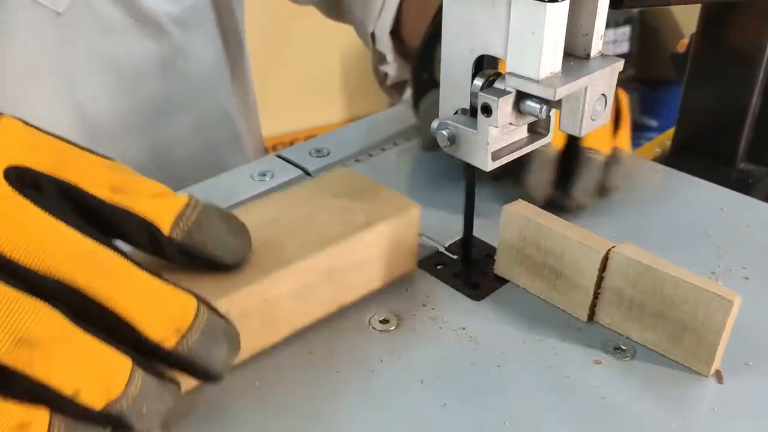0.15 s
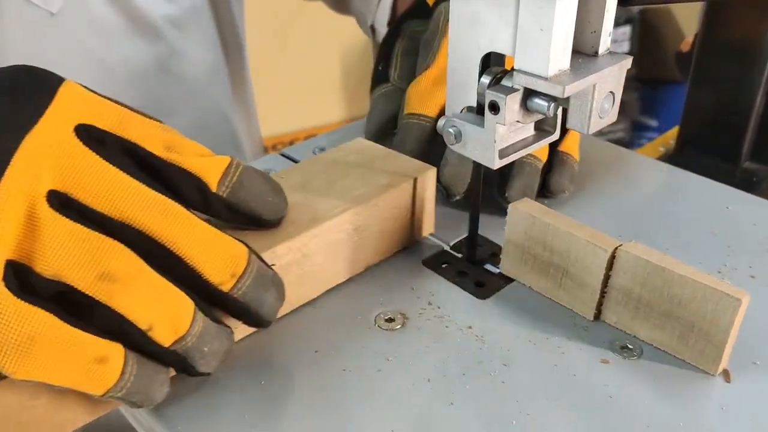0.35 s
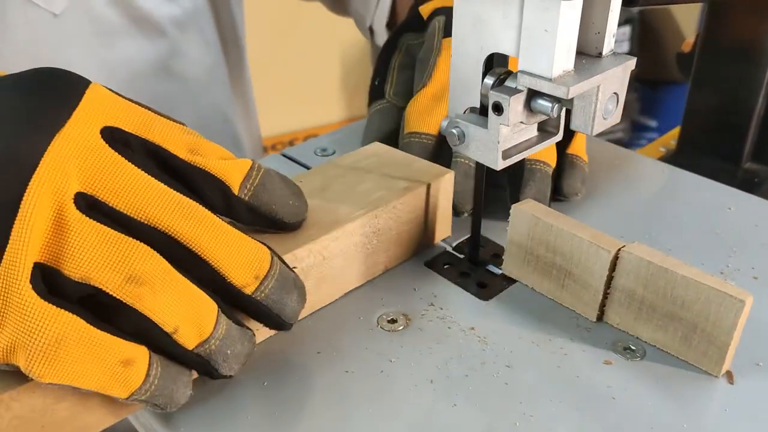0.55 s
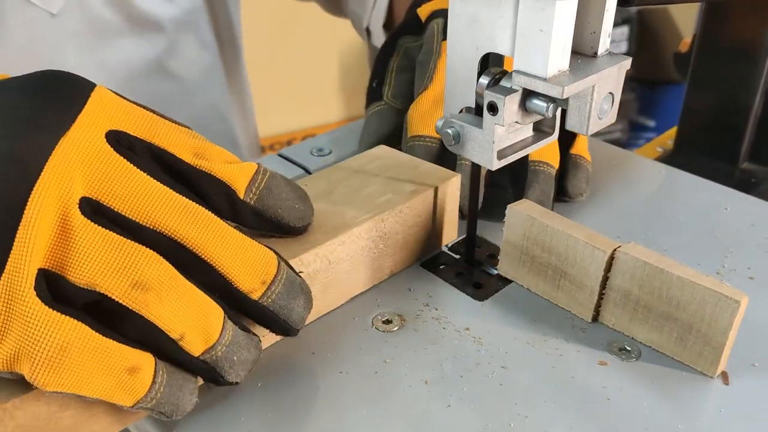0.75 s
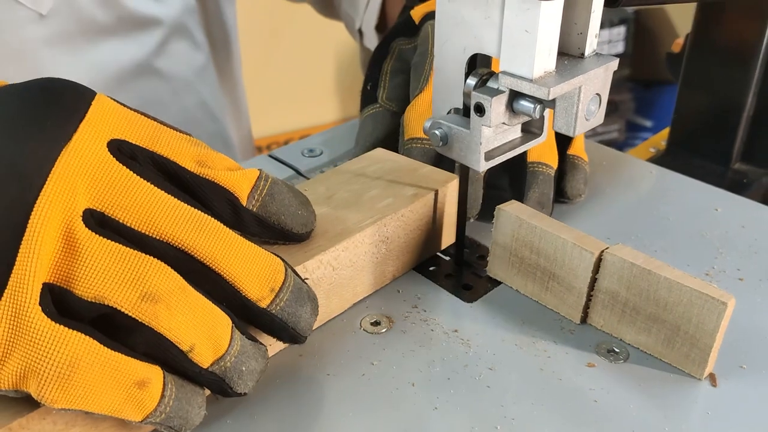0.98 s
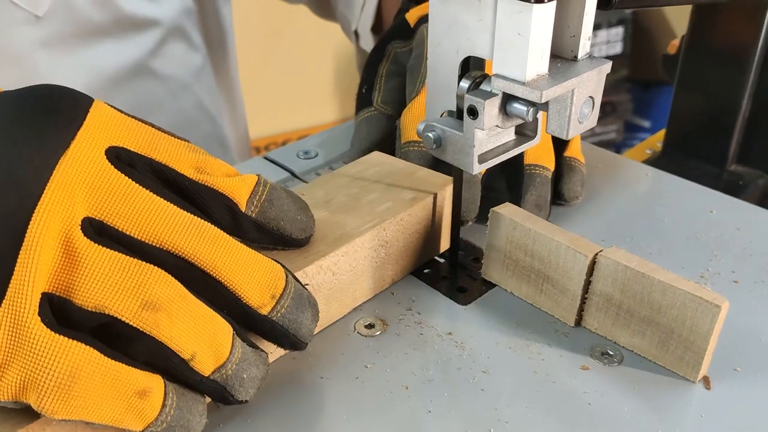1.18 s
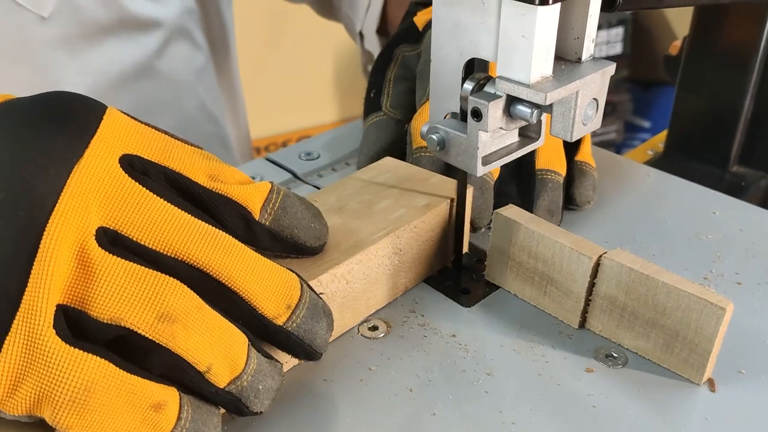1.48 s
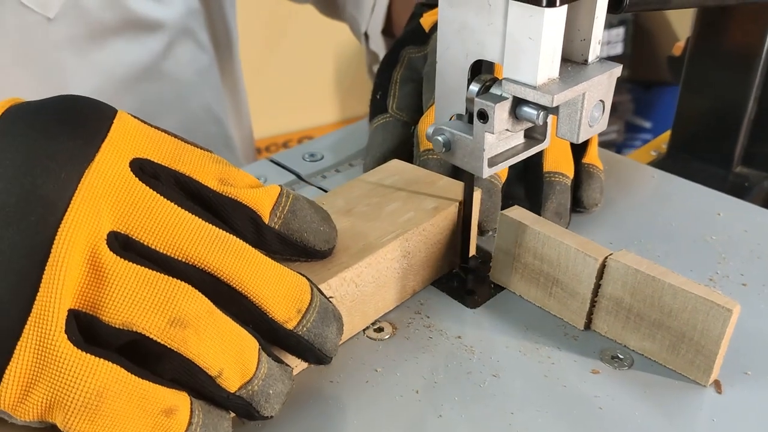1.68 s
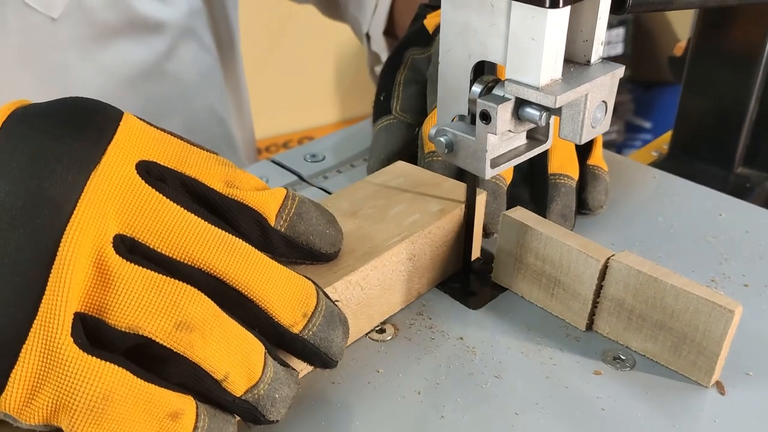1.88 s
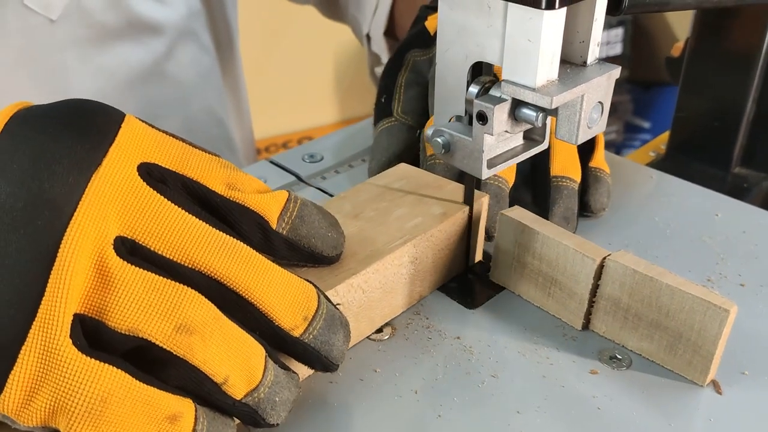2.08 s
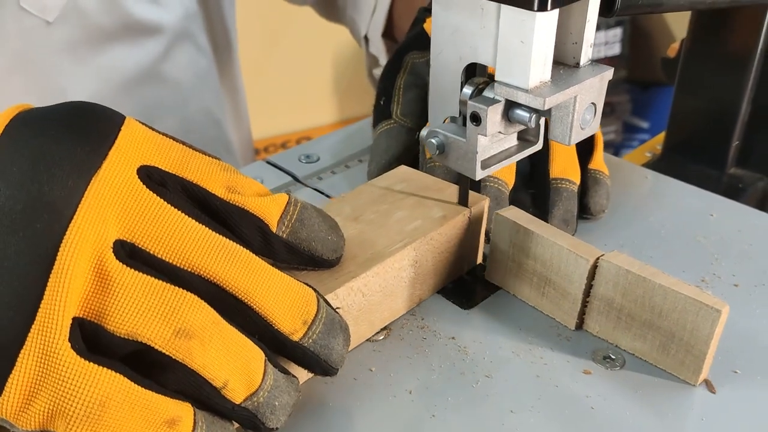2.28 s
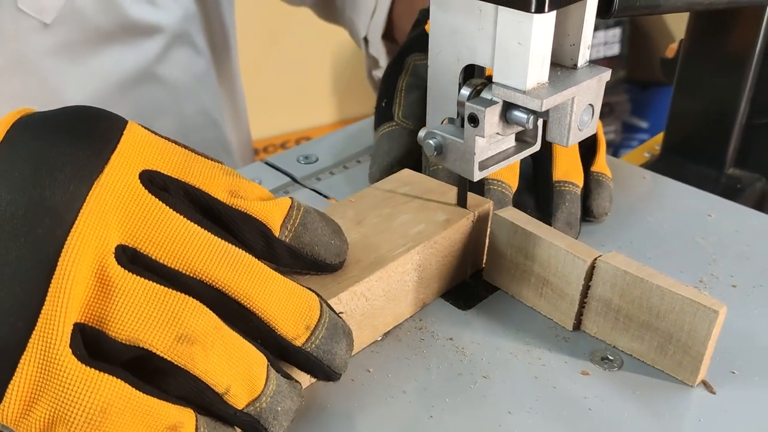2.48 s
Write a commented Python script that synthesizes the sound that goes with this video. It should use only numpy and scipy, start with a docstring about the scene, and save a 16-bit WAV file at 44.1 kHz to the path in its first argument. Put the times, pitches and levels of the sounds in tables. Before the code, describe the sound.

A band saw hums, then rasps and whines as it cuts into a block of wood.

```python
"""A hum, a whine and a thin ring of the blade in its guides: a benchtop band saw idles close to a mono
microphone, which puffs of air buffet. A wooden block brushes over the table and meets the blade at
1.5 s. The teeth rasp and sing at their passing rate, surging three times a lap of the blade, and
shake the block and the table; now and then the blade chatters in the kerf."""
import sys
import numpy as np
from scipy import signal
from scipy.fft import rfft, irfft
from scipy.io import wavfile

SR = 44100
rng = np.random.default_rng(int(sys.argv[2]) if len(sys.argv) > 2 else 0)


def master_out(mix):
    """Clip the mix to full scale and print it as 16-bit PCM to the path in sys.argv[1]."""
    frames = np.transpose(np.atleast_2d(mix))
    ceiling = np.clip(frames, -1, 1)
    pcm = np.round(ceiling * 32767).astype(np.int16)
    wavfile.write(sys.argv[1], SR, pcm)


N = 116865
T = np.arange(N) / SR
TEETH, CONTACT_S, CONTACT_RISE_S = 372, 1.498, 0.011
# pressure feeding the block into the blade: t/s, relative level/dB
FEED_PRESSURE = [(1.5, -10.5), (1.579, -4), (1.66, -5), (1.72, -3), (1.83, -2.5), (1.95, -3), (2.06, 1),
                 (2.139, -2), (2.199, -1.5), (2.35, -0.5), (2.45, -.5), (2.65, -.5)]


def amp(db):
    """Decibels to gain."""
    return 10 ** (np.asarray(db) / 20)


def unit(x):
    """Scales to rms 1."""
    return x / np.sqrt(np.mean(abs(x) ** 2) + 1e-20)


def curve(points):
    """Joins (t/s, value) points with straight lines."""
    return np.interp(T, *np.transpose(points))


def swell(at, length):
    """A smooth rise and fall around a moment."""
    return np.exp(-((T - at) / length) ** 2)


def colour(x, points):
    """Filters by a spectrum (f/Hz, relative level/dB); rms 1."""
    hz, db = np.transpose(points)
    f = np.fft.rfftfreq(N, 1 / SR)
    gain = amp(np.interp(np.log(f + 1), np.log(hz + 1), db))
    return unit(irfft(rfft(x) * gain, N))


def ring(x, hz, width):
    """A steep-sided resonance; rms 1."""
    f = np.fft.rfftfreq(N, 1 / SR)
    return unit(irfft(rfft(x) / (1 + 1j * (f - hz) / width) ** 2, N))


def tone(hz, unsteady, width_hz):
    """A tone whose strength and phase wander, from pure (unsteady 0) to narrow noise (1); rms 1."""
    f = np.fft.fftfreq(N, 1 / SR)
    a, b = rng.standard_normal((2, N))
    wander = unit(np.fft.ifft((a + 1j * b) / (1 + (f / width_hz) ** 2) ** 1.47))
    carrier = np.exp(2j * np.pi * np.cumsum(hz * np.ones(N)) / SR)
    return unit(((np.sqrt(1 - unsteady ** 2) + unsteady * wander) * carrier).real)


def idle():
    """Motor hum, wheel whine that sags under load and the blade rubbing its guides, over a whirr."""
    # hum and high tones of the machine: f/Hz, level/dB, unsteadiness/0-1, width/Hz
    motor_tones = [(49.4, -31, 0, 10), (300.4, -49, 0.54, 2.7), (365, -51, 0, 13), (4220, -63.5, 0.9, 100),
                   (5470, -66, 1, 90), (9630, -77, 1, 200), (10070, -82, 0.95, 90), (11660, -82, 0.93, 120)]
    # ring of the blade in its guides: t/s, level/dB
    guide_levels = [(0, -56), (.11, -52.5), (.19, -79), (.28, -66), (.34, -54), (.68, -57), (.75, -47.5),
                    (.88, -65), (.97, -49.5), (1.05, -50.5), (1.2, -58.5), (1.36, -49.5), (1.48, -56),
                    (2.65, -44)]
    # whirr of air and bearings: f/Hz, relative level/dB
    whirr_spectrum = [(110, -15), (175, -16), (240, -6), (330, -1), (400, -7), (450, -7), (540, -9.5),
                      (620, -3.5), (720, -1.5), (790, -3.5), (880, -11), (1000, -12), (1220, -11),
                      (1450, -15), (1680, -9.5), (1850, -14), (2000, -19.5), (2550, -17.5), (2800, -23),
                      (3080, -22), (3500, -18.5), (3900, -21.5), (4250, -29), (4400, -42), (4750, -24.5),
                      (5150, -26), (6200, -29.5), (7300, -35), (8800, -38.5), (9700, -39.5), (10500, -45),
                      (13500, -51), (15700, -51)]
    hum = sum(amp(db) * tone(hz, unsteady, width) for hz, db, unsteady, width in motor_tones)
    times, feed_db = np.transpose(FEED_PRESSURE)
    load = np.interp(T, times, amp(feed_db), left=0)
    whine = amp(-38.5) * tone(hz=738.5 - 6.09 * load, unsteady=.33, width_hz=35)
    guides = amp(curve(guide_levels)) * tone(hz=4993, unsteady=.6, width_hz=45)
    whirr = amp(-39) * colour(rng.standard_normal(N), whirr_spectrum)
    return hum + whine + guides + whirr


def air():
    """A lumpy draught and sharper puffs of eddying air press on the close microphone."""
    # draught at the microphone: t/s, level/dB
    draught_levels = [(0, -20), (.2, -17), (.34, -26.5), (.42, -17.5), (.6, -15.5), (.78, -3.5),
                      (.95, -19.5), (1.15, -20), (1.3, -28), (1.55, -30), (1.7, -34), (1.88, -32.5),
                      (2.03, -9.5), (2.13, -20.5), (2.2, -10.5), (2.45, -18.5), (2.55, -18.5), (2.65, -33)]
    # its rumble: f/Hz, relative level/dB
    draught_spectrum = [(3, -13.5), (10, 16), (25, -4), (50, -11.5), (90, -22.5), (160, -36), (400, -99)]
    # puffs of air: t/s, length/s, level/dB
    puffs = [(.05, 0.035, -31.5), (0.416, 0.026, -25.5), (0.493, 0.017, -16.5), (0.662, 0.018, -12.5),
             (0.708, 0.0072, -13.5), (0.747, 0.012, -11), (0.851, 0.019, -16.5), (0.878, 0.019, -8.5),
             (.92, .008, -16), (0.965, 0.017, -26), (1.042, 0.014, -28), (1.212, 0.017, -29.5),
             (1.926, 0.011, -26), (2.073, 0.011, -14.5), (2.21, 0.017, -27.5), (2.418, 0.0071, -20),
             (2.48, 0.039, -24.5), (2.63, 0.063, -24.5)]
    # their thud: f/Hz, relative level/dB
    puff_spectrum = [(15, -20), (45, 4), (80, -3.5), (150, -13), (230, -21), (350, -44.5), (700, -87)]
    draught = amp(curve(draught_levels)) * colour(rng.standard_normal(N), draught_spectrum)
    buffeting = sum(amp(db) * swell(at, length) for at, length, db in puffs)
    return draught + buffeting * colour(rng.standard_normal(N), puff_spectrum)


def slide():
    """The block brushes over the metal table on its way to the blade."""
    # push of the block: t/s, length/s, level/dB
    pushes = [(0.084, 0.096, -44)]
    # wood rubbing on metal: f/Hz, relative level/dB
    friction_spectrum = [(300, 3), (900, 5), (2600, -6), (3500, 0), (4600, -12), (7000, -15), (10000, -27),
                         (15000, -34)]
    motion = sum(amp(db) * swell(at, length) for at, length, db in pushes)
    return motion * colour(rng.standard_normal(N), friction_spectrum)


def chatter():
    """Single modes of the blade flare up in the kerf."""
    # flares: t/s, length/s, f/Hz, width/Hz, level/dB
    flares = [(1.508, .008, 10750, 250, -47), (1.68, .17, 10800, 260, -53), (1.59, .028, 757, 30, -29),
              (1.93, .07, 596, 20, -41), (2.21, .05, 593, 20, -34), (2.55, .09, 1623, 35, -37),
              (2.55, .09, 1735, 35, -38), (2.362, .008, 5050, 150, -30), (2.57, .14, 5080, 170, -36)]
    return sum(amp(db) * swell(at, length) * tone(hz, unsteady=1, width_hz=width)
               for at, length, hz, width, db in flares)


def strikes(teeth_passed):
    """A click and a spurt of tearing per tooth: each tooth keeps its own bite, each chip its size."""
    tooth = teeth_passed.astype(int)
    bite_db = 2 * rng.standard_normal(TEETH)[tooth % TEETH]
    chip_db = 1.8 * rng.standard_normal(N)[tooth]
    size = amp(bite_db + chip_db)
    clicks = np.diff(tooth, prepend=0) * (size - size.mean())
    spurts = .5 + np.exp(-(teeth_passed % 1) / 1.04)
    return clicks, size * spurts * rng.standard_normal(N)


def shaking(clicks, tearing, feed_db):
    """The strikes shake the block and ring block, table and blade, louder with a harder feed."""
    # dull thrum of the block: f/Hz, relative level/dB
    thrum_spectrum = [(120, -12), (170, -15.5), (197, -1.5), (240, -3), (300, -5), (350, -1), (410, 1),
                      (470, -7), (510, -2.5), (550, -9.5), (680, -4), (790, -4.5), (860, -9), (920, -15.5),
                      (1300, -20), (2500, -63)]
    # modes of block, table and blade: f/Hz, width/Hz, level/dB at 0 dB feed
    modes = [(294.3, 17, -32.5), (323.9, 11.4, -35), (418.5, 23, -48.5), (595.8, 11, -43), (735, 4.3, -43),
             (780, 63, -42), (838, 16, -49.5), (1130, 25, -57), (1649, 20, -44.5), (1773, 93, -43.5),
             (3180, 130, -45.5), (3524, 83, -44), (3830, 60, -46), (4146, 69, -46), (4967, 37, -41),
             (5595, 80, -43.5), (7280, 100, -51.5), (10700, 150, -55.5), (12500, 230, -60)]
    thrum = amp(-29 + 1.36 * feed_db) * colour(clicks, thrum_spectrum)
    force = unit(clicks) + 0.75 * unit(tearing)
    ringing = sum(amp(db) * ring(force, hz, width) for hz, width, db in modes)
    return thrum + amp(0.69 * feed_db) * ringing


def tooth_song(tooth_hz):
    """The teeth sing at their passing rate, with side tones from the blade's flutter."""
    # tones around the passing rate: offset/Hz, unsteadiness/0-1, width/Hz
    partials = [(0, .65, 45), (-170, .6, 35), (-280, 1, 150), (0, 1, 380)]
    # strength of each tone: relative level/dB
    levels = [-34.5, -38.5, -39.5, -36.5]
    return sum(amp(db) * tone(tooth_hz + offset, unsteady, width)
               for (offset, unsteady, width), db in zip(partials, levels))


def cut():
    """Teeth tear the wood, shake it and sing; the blade surges three times a lap."""
    # passing rate of the teeth: t/s, f/Hz
    tooth_rate = [(1.5, 2768), (1.57, 2755), (1.66, 2726), (1.83, 2722), (1.95, 2738), (2.3, 2742),
                  (2.5, 2732), (2.65, 2742)]
    # the teeth grab harder: t/s, length/s, boost of the song/dB
    grabs = [(1.504, 0.013, 11.5), (1.69, 0.0095, 6), (1.745, 0.0057, 5), (1.818, 0.004, 6.5),
             (1.863, 0.0044, 4), (1.905, 0.0096, 7.5), (1.968, .009, 13), (2.043, 0.014, 6.5),
             (2.081, 0.0087, 4.5), (2.105, 0.0071, 9), (2.137, .004, 2), (2.173, .005, 7),
             (2.19, 0.013, 5.5), (2.242, 0.0077, 9), (2.277, 0.0079, 5.5), (2.313, 0.0048, 9.5),
             (2.38, 0.0018, 16), (2.443, 0.006, 1), (2.47, 0.0034, 9), (2.555, 0.0035, 8.5),
             (2.642, .006, 3)]
    # rasp as the teeth reach more of the block's height: t/s, relative level/dB
    engagement = [(1.5, -8), (1.53, -7), (1.665, -5.5), (1.695, -2), (1.85, -1.5), (2.05, 1.5), (2.14, 0),
                  (2.22, .5), (2.4, -0.2), (2.65, 0)]
    # tearing fibres: f/Hz, relative level/dB
    rasp_spectrum = [(500, -32), (900, -11), (1150, -10.5), (1400, -10.5), (1700, -8.5), (2130, -12),
                     (2300, -5.5), (2600, -4.5), (2900, -6.5), (3500, -9.5), (3750, -14), (4500, -11.5),
                     (5200, -9), (6050, -14.5), (7100, -12.5), (7700, -17.5), (8400, -18.5), (8850, -22.5),
                     (9600, -20.5), (11500, -24.5), (12700, -29.5), (14000, -32), (15600, -37)]
    feed_db, tooth_hz = curve(FEED_PRESSURE), curve(tooth_rate)
    teeth_passed = np.cumsum(tooth_hz) / SR
    laps = (teeth_passed - np.interp(CONTACT_S, T, teeth_passed)) / TEETH
    surge_db = 3.4 * np.cos(2 * np.pi * 3 * (laps - 0.028))
    grab_db = surge_db + sum(db * swell(at, length) for at, length, db in grabs)
    clicks, tearing = strikes(teeth_passed)
    rasp = amp(-30 + curve(engagement) + .13 * grab_db) * colour(tearing, rasp_spectrum)
    song = amp(1.4 * feed_db + grab_db) * tooth_song(tooth_hz)
    return rasp + shaking(clicks, tearing, feed_db) + song


def scene():
    """The saw, the block and the stirred air, heard close up at the bench."""
    contact = np.clip((T - CONTACT_S) / CONTACT_RISE_S, 0, 1)
    return (idle() + slide() + contact * (cut() + chatter()) + air())[None]


def record(dry):
    """The microphone's signal loses its highest treble in a steep low-pass."""
    lowpass = signal.firwin(511, cutoff=15700, window=("kaiser", 9), fs=SR)
    return signal.oaconvolve(dry, lowpass[None], "same")


dry = scene()
out = record(dry)
master_out(out)
```